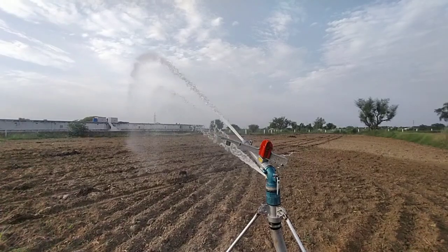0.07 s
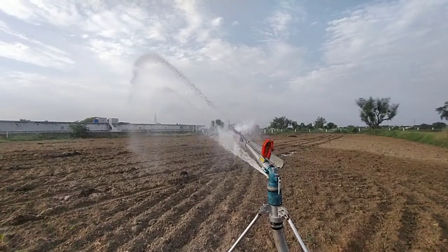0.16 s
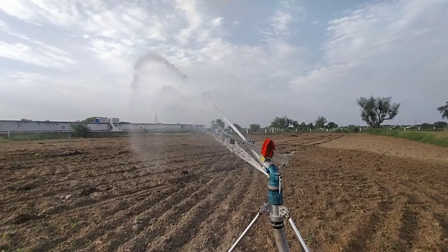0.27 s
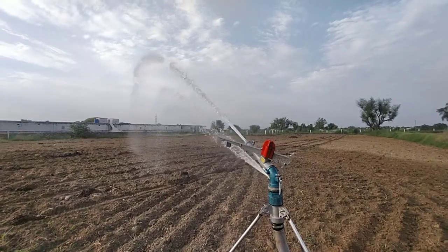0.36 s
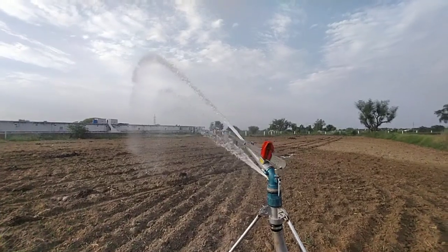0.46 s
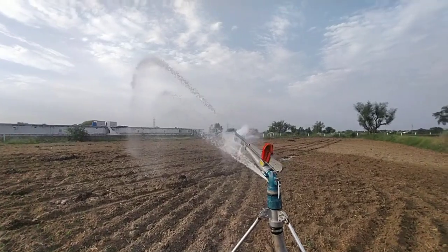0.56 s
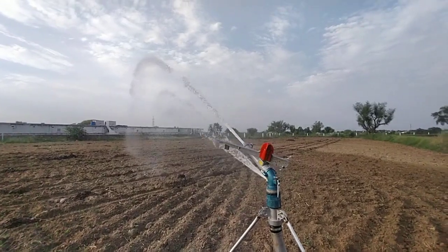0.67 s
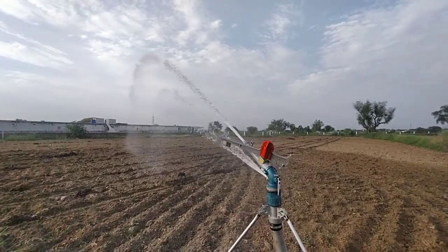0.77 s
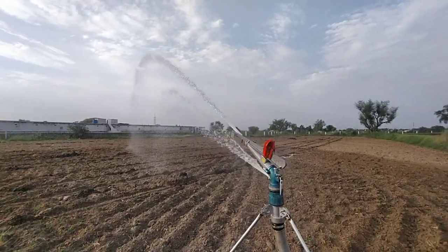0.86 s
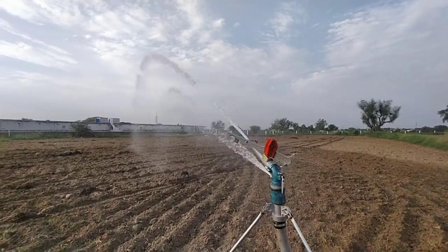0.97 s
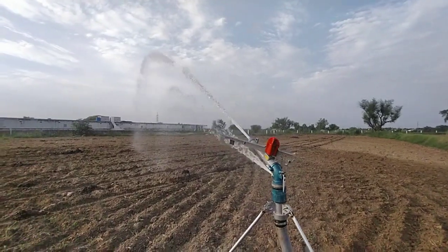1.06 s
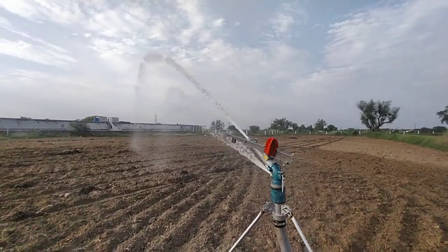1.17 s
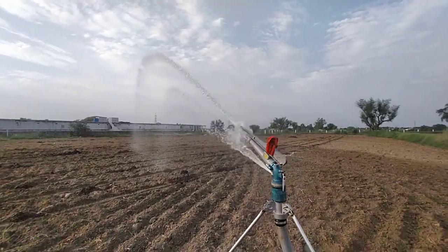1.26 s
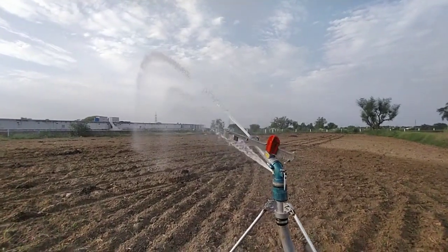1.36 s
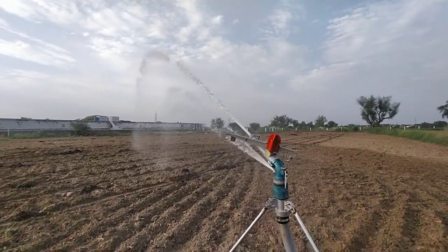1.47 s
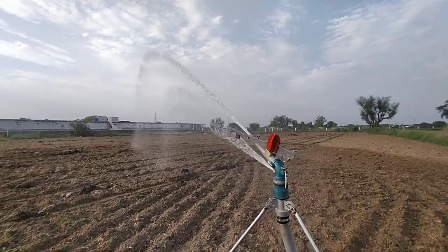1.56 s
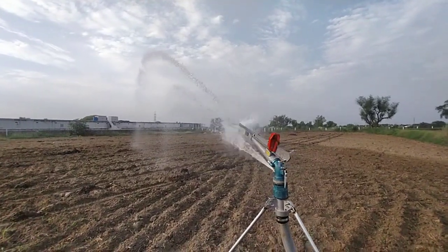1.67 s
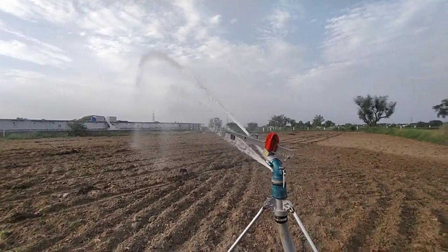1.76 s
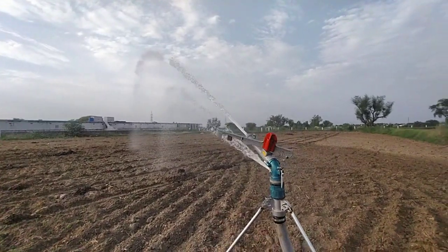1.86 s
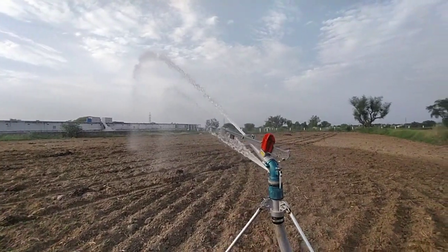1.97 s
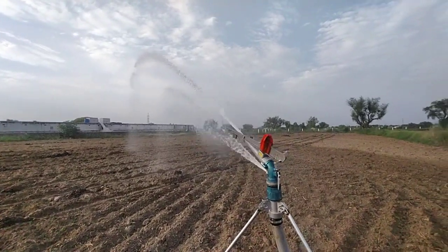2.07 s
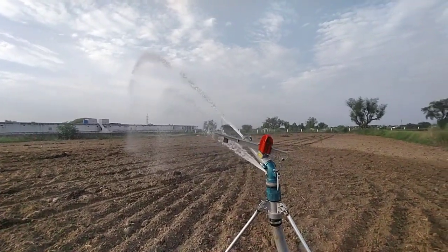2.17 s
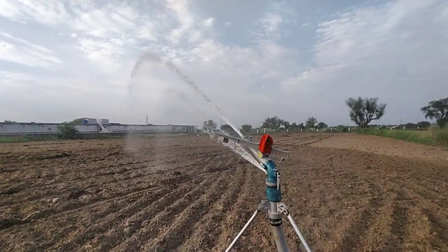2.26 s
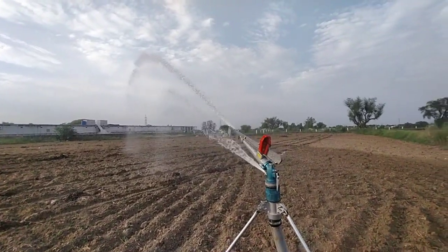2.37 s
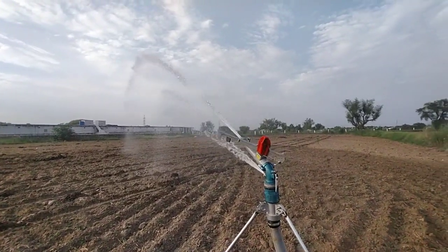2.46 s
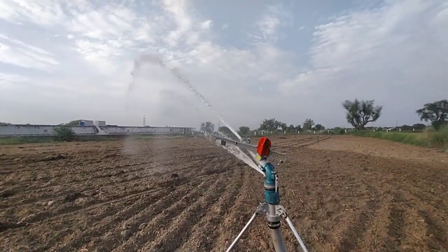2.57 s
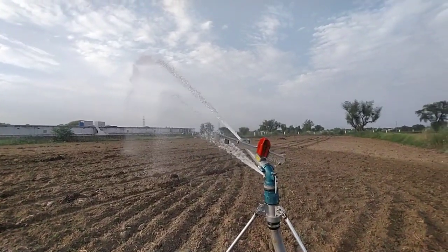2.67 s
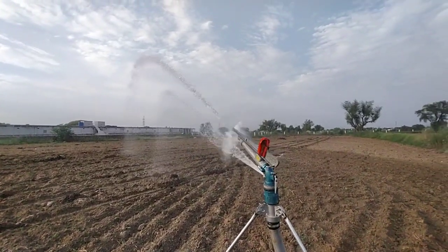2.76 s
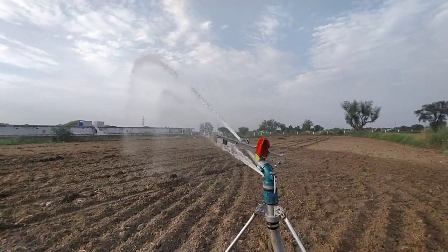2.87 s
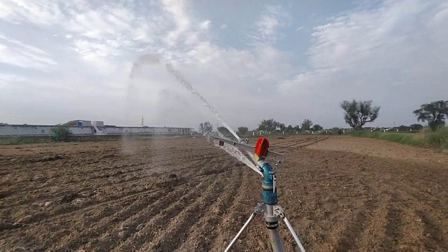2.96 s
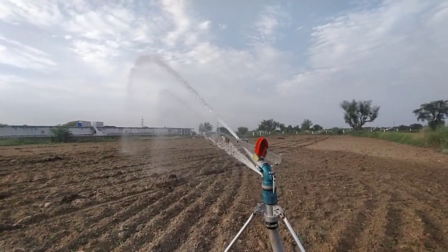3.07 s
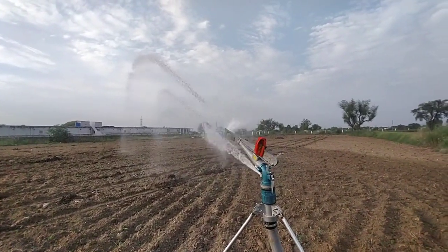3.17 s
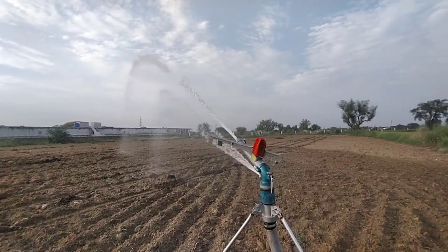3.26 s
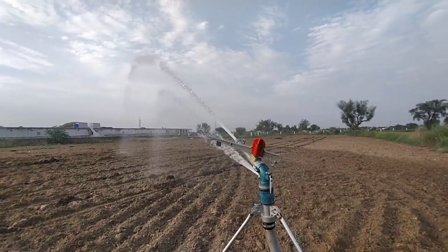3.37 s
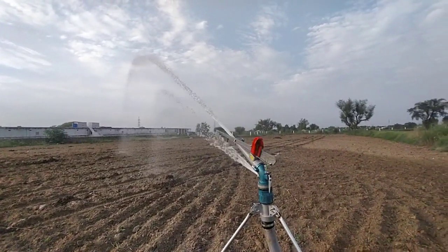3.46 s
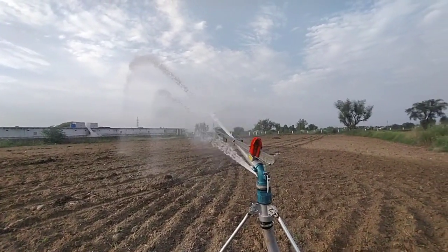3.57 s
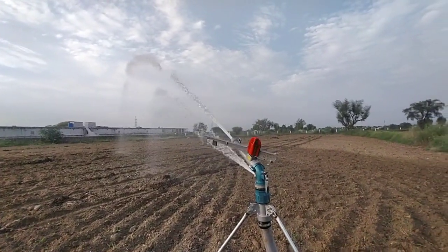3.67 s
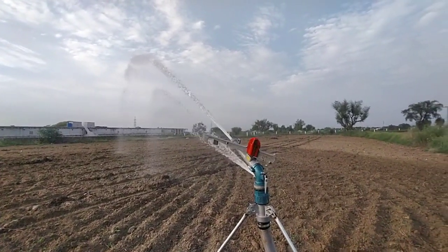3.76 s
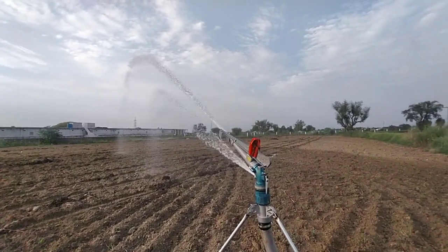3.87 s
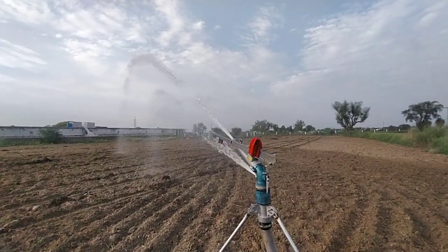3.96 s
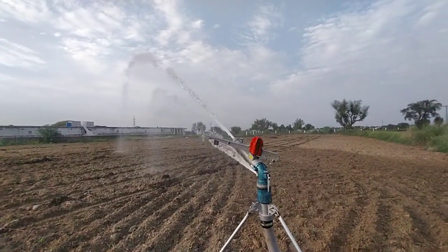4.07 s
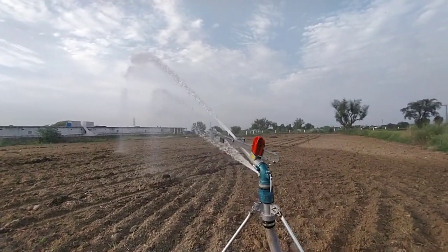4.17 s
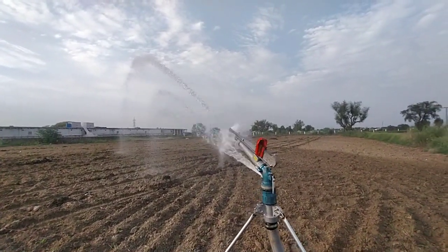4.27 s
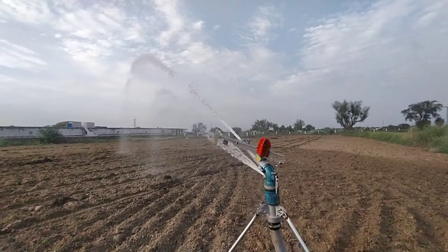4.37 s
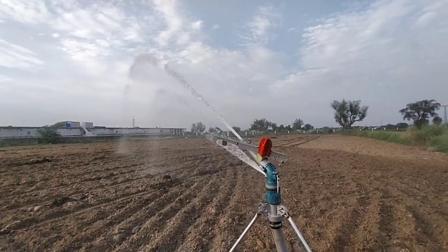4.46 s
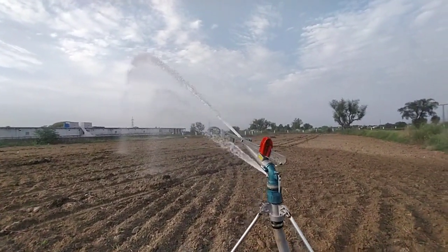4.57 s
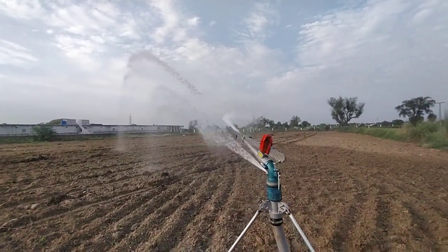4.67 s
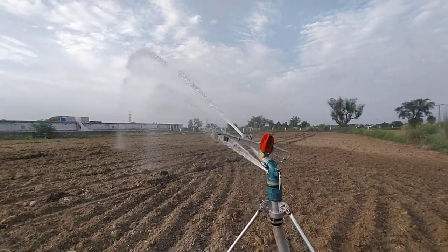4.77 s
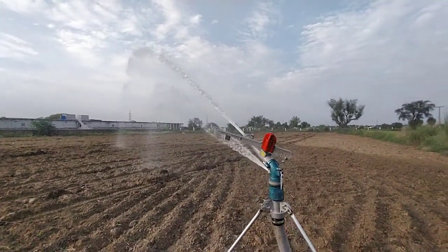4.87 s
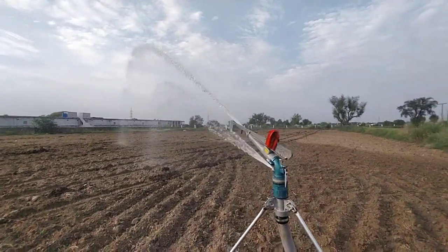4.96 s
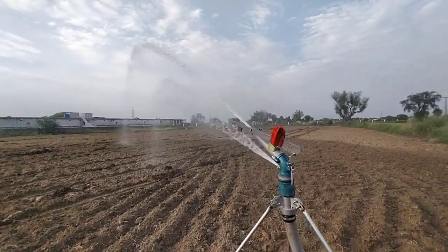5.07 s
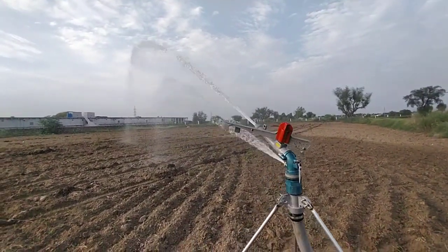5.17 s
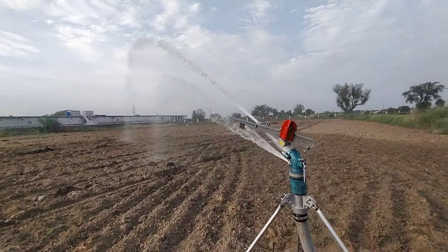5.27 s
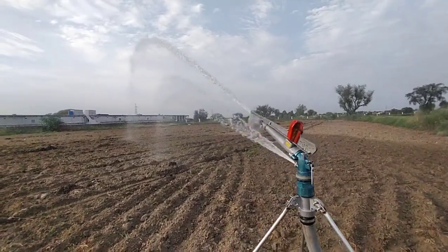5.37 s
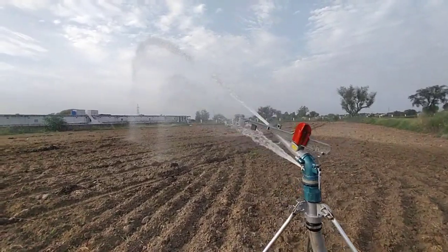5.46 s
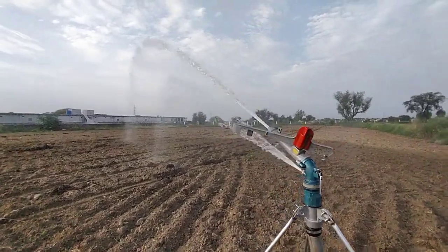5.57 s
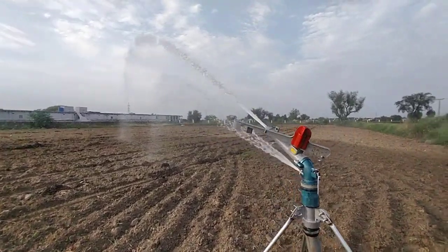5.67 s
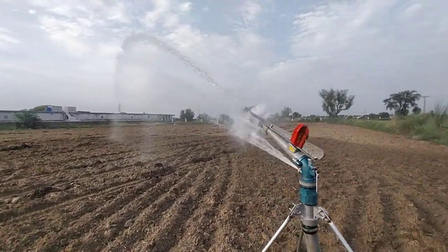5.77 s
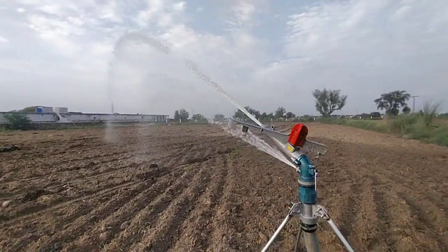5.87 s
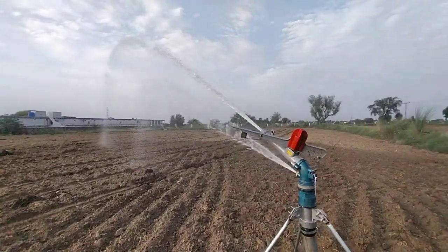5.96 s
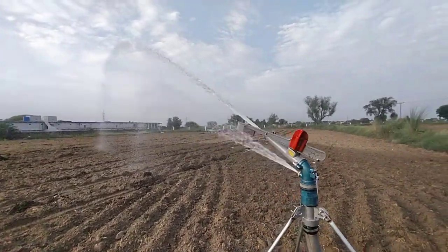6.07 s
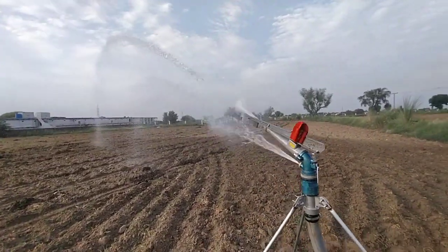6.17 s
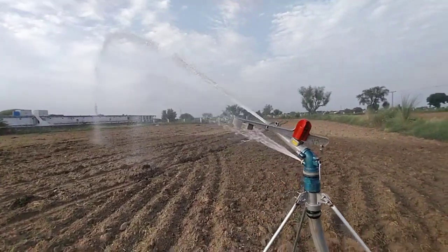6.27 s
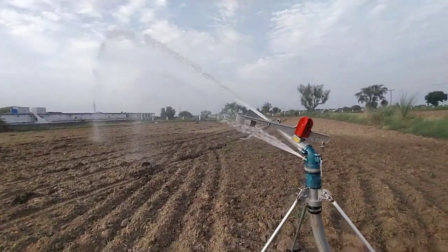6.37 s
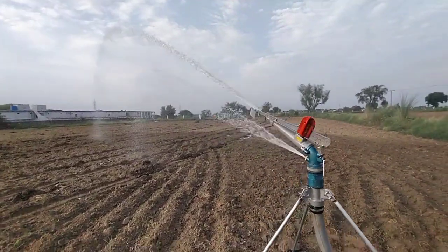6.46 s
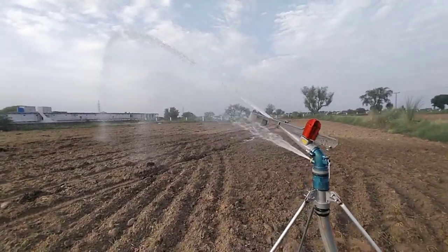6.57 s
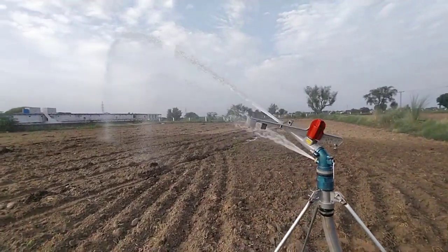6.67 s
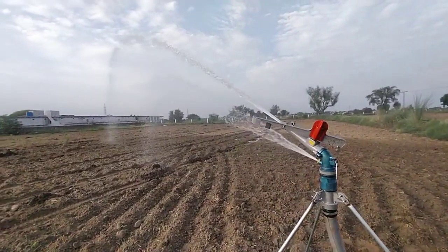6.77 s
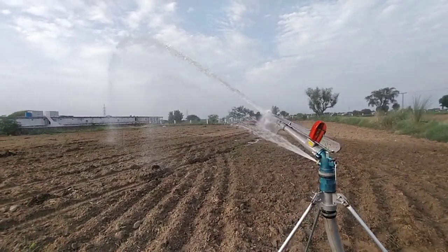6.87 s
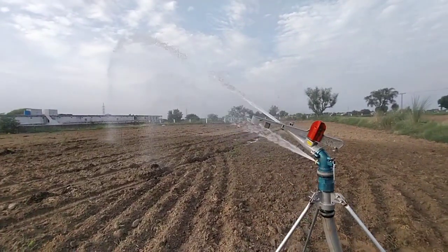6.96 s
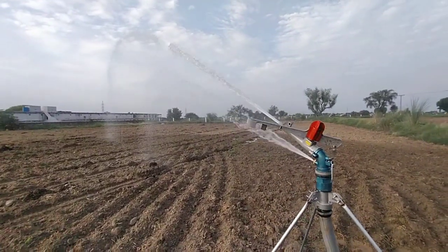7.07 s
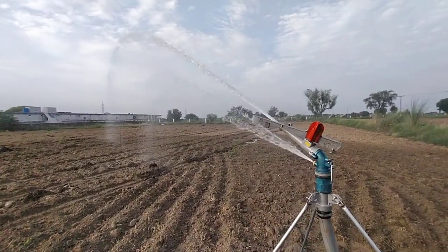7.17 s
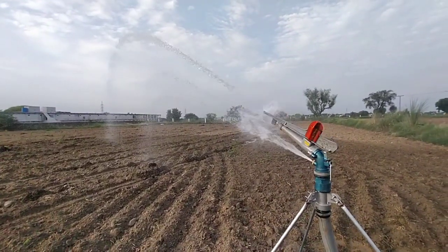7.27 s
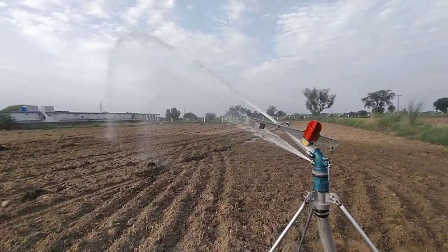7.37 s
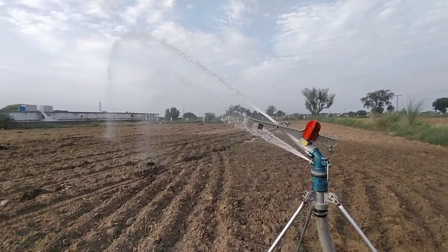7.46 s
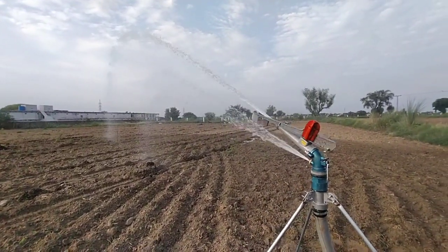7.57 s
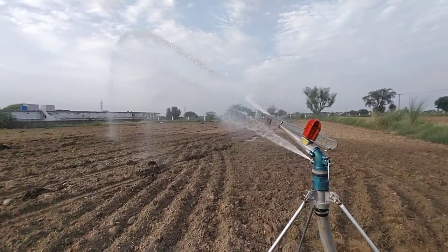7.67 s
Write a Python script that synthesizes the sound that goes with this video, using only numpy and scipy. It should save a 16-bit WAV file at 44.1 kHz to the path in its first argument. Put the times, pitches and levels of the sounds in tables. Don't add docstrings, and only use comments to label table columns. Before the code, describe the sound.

Open field, dry and without echo, with an impact sprinkler close by. Following half a second of silence, regular strokes arrive nearly three per second: splashy tss, woody-metallic clack, then loose high clinks as the arm rebounds. Between them the water jet flutters, fizzes and spits. The hiss swells and brightens towards the end as the nozzle turns. Wind rumbles irregularly on the handheld microphone, over a barely audible low pump tone.

```python
import sys
import numpy as np
from scipy import signal
from scipy.io import wavfile
from scipy.ndimage import uniform_filter1d

SR = 44100
rng = np.random.default_rng(int(sys.argv[2]) if len(sys.argv) > 2 else 0)


def how_loud(loudness_db):
    steps = np.asarray(loudness_db, float) / 20
    return 10 ** steps


def master(y):
    cut = np.clip(np.atleast_2d(y).T, -1, 1)
    pcm = np.round(cut * 32767)
    wavfile.write(sys.argv[1], SR, pcm.astype(np.int16))


N = 340893
TIME = np.arange(N) / SR
RING_HZ = 4394

# (frequency [Hz], level per Hz [dB])
SPRAY = [(240, -64), (400, 0.5), (496, -10), (814, -1.5), (1110, -16), (1350, -3), (2120, -10), (2360, -4),
         (3020, -21), (4380, 9), (5270, 2), (8900, -16), (10500, -14.5), (14600, -33.5), (16000, -15)]
# (time [s], treble gain [dB])
TURN = [(.5, -7), (3.0, -6), (5.5, -1), (7.73, 4)]


def evened(x):
    return x / np.sqrt(np.mean(x ** 2) + 1e-20)


def add(mix, s, sound):
    part = mix[round(s * SR):][:len(sound)]
    part += sound[:len(part)]


def curve(table, s):
    return np.interp(s, *np.transpose(table))


def colour(x, points):
    f, db = np.transpose(points)
    hz = np.minimum(abs(np.fft.fftfreq(2 ** 13, 1 / SR)), 14800)
    wanted_db = np.interp(np.log(hz + 1), np.log(f), db)
    log_gain = np.log(how_loud(np.maximum(wanted_db, -100)))
    phase = -signal.hilbert(log_gain).imag
    taps = np.fft.ifft(np.exp(log_gain + 1j * phase)).real[:2 ** 12]
    return signal.oaconvolve(x, taps / np.linalg.norm(taps))[:len(x)]


def split(x, hz):
    low = signal.sosfiltfilt(signal.butter(2, hz, fs=SR, output="sos"), x)
    return low, x - low


def turned(x, bright_db, hz):
    low, high = split(x, hz)
    return low * how_loud(-0.3 * bright_db) + high * how_loud(bright_db)


def drift(count, seconds):
    width = max(round(seconds * SR), 1)
    once = uniform_filter1d(rng.standard_normal(count), width)
    return evened(uniform_filter1d(once, width))


def drops(count, per_s, spread_db):
    hit = rng.random(count) < per_s / SR
    sign = np.sign(rng.standard_normal(count))
    size = np.minimum(rng.exponential(1, count), 4)
    return evened(hit * sign * how_loud(spread_db * size))


def grains(count, per_s, low_hz, high_hz, cycles, spread_db):
    clicks, pick = drops(count, per_s, spread_db), rng.integers(0, 8, count)
    out = np.zeros(count)
    for k, hz in enumerate(np.geomspace(low_hz, high_hz, 8)):
        turns = np.arange(2 ** 9) * hz / SR
        burst = np.sin(2 * np.pi * turns) * turns * np.exp(-3 * turns / cycles) / cycles
        out += signal.oaconvolve(clicks * (pick == k), burst)[:count]
    return evened(out)


def ring(force, hz, t60):
    r, w = np.exp(-np.log(1000) / (t60 * SR)), 2 * np.pi * hz / SR
    return signal.lfilter([0, np.sin(w)], [1, -2 * r * np.cos(w), r * r], force)


def hum():
    wander_hz, wander_db = 0.9 * drift(N, 0.15), 0.8 * drift(N, 0.08)
    turns = np.cumsum(127.5 + wander_hz) / SR
    return np.sqrt(2) * how_loud(-55.5 + wander_db) * np.sin(2 * np.pi * turns)


def wind():
    # (frequency [Hz], level per Hz [dB])
    rumble = [(8, -6), (20, 6.5), (40, 6.5), (80, -3), (160, -8), (300, -23), (600, -48)]
    # (time [s], level [dB])
    gusts = [(0.7, -54.5), (1.01, -53), (1.04, -41.5), (1.13, -53.5), (1.4, -50.5), (2.32, -51.5),
             (3.75, -47.5), (4.01, -54.5), (4.13, -45), (5.04, -51), (5.25, -44), (5.64, -48.5),
             (5.72, -43.5), (5.85, -50.5), (6.14, -42.5), (6.42, -48.5), (7.43, -51), (7.73, -54)]
    # (time [s], peak pressure [full scale], width [ms])
    puffs = [(0.5603, 0.096, 0.17), (0.6346, 0.032, 0.14), (1.04, 0.041, 0.3), (4.1242, -0.056, 2.2),
             (4.298, -0.01, 0.25), (5.249, 0.036, 0.17), (5.373, 0.018, 0.66), (5.719, -0.03, 4),
             (6.107, -0.044, 4.5), (6.15, 0.11, 4.4), (6.216, -0.029, 3.3)]
    lumps_db = 3 * drift(N, 0.051) + 1.7 * drift(N, 0.0098)
    out = colour(rng.standard_normal(N), rumble) * how_loud(curve(gusts, TIME) + 1.5 + lumps_db)
    t = np.arange(-400, 2000) / SR
    after = np.maximum(t, 0)
    for s, peak, ms in puffs:
        push = 1 / (1 + (t / (ms / 1000)) ** 2)
        swing = 0.5 * np.sqrt(ms) * np.sin(2 * np.pi * 24 * after) * np.exp(-after / 0.013)
        add(out, s + t[0], peak * (push - swing))
    return out


def jet():
    # (frequency [Hz], level per Hz [dB])
    hiss_colour = [(150, -48), (250, -5), (319, -7.5), (519, -12), (586, -8), (860, -4.5), (955, -5),
                   (1670, -3.5), (1980, -4.5), (3650, -4.5), (4990, 0.5), (8400, -15), (10200, -19.5),
                   (14900, -24.5), (16000, -1)]
    # (frequency [Hz], level [dB], time to fall 60 dB [s])
    pipe = [(890, -41, 0.14), (1714, -38, 0.045), (2310, -52.5, 0.15)]
    # (time [s], hiss level [dB])
    nearness = [(.55, -56), (.9, -52.5), (2.0, -49.5), (3.14, -47.5), (3.7, -49), (4.3, -47.5), (5.75, -45),
                (6.5, -45.5), (7.6, -45.5)]
    # (frequency [Hz], level per Hz [dB])
    mist_colour = [(6000, -18), (8700, -17), (9700, -3.5), (10500, -1.5), (11600, -16), (13500, -11.5),
                   (16000, -17)]
    flutter_db = 2.45 * drift(N, 0.00094) + 0.57 * drift(N, 0.043)
    flow = rng.standard_normal(N) * how_loud(flutter_db)
    water = colour(flow, hiss_colour)
    for hz, db, t60 in pipe:
        water += how_loud(db) * ring(flow, hz, t60)
    water += grains(N, 1300, 3500, 6000, 4.5, 3.8) * how_loud(-5 + 2.5 * drift(N, 0.012))
    water += grains(N, 220, 3000, 8000, 1.6, 3.2) * how_loud(-13 + 3 * drift(N, 0.05))
    near_db = curve(nearness, TIME)
    near = turned(water, curve(TURN, TIME), 5550) * how_loud(near_db + 1.0)
    mist = colour(rng.standard_normal(N), mist_colour)
    return near + how_loud(-67.5 + 1.13 * (near_db + 53.5)) * mist


def rattle(s, ring_db, knock_db):
    # (frequency [Hz], level [dB], time to fall 60 dB [s])
    knock = [(1430, -17, 0.055), (1800, 1.5, 0.02), (2030, -3.5, 0.01), (2405, -1.5, 0.016),
             (3230, -4, 0.008)]
    t = np.arange(5000) / SR
    turn_db = curve(TURN, s)
    twin = np.sin(2 * np.pi * ((RING_HZ - 35) * t + rng.random()))
    pair = np.sin(2 * np.pi * RING_HZ * t) + 0.1 * twin
    ring_s = 0.064 * (1 + 0.035 * turn_db)
    bright = pair * how_loud(-60 * (t / ring_s) ** 1.17) * (1 - np.exp(-t / 0.0013))

    touch = np.exp(-t / 0.0062) * rng.standard_normal((len(knock) + 1, len(t)))
    pitch = 0.89 + 0.012 * turn_db
    dull = sum(how_loud(db) * ring(force, hz * pitch, t60) for force, (hz, db, t60) in zip(touch, knock))
    dull = dull / abs(dull).max() + 0.16 * colour(touch[-1], SPRAY)
    return s - 0.001, how_loud(ring_db + 5.5) * bright + how_loud(knock_db + 0.5) * dull


def chatter(s, spray_db):
    # (time after the stroke [s], ring against the spray [dB], dull knock against the spray [dB])
    bounces = [
        (.043, -35, -22.5),
        (.07, -36, -28.5),
        (.097, -36.5, -29.5),
        (.122, -49, -26.5),
        (.146, -46, -34),
    ]
    chance = rng.standard_normal((len(bounces), 3)) * [0.0043, 3.5, 3.5]
    return np.array(bounces) + chance + [s, spray_db, spray_db]


def torn_spray(t, turn_db):
    # (frequency [Hz], level [dB], time to fall 60 dB [s])
    spoon = [(3380, -4, 0.02), (3680, 5, 0.021), (3896, 14, 0.014), (4221, -28, 0.01), (5240, -17, .02),
             (5500, -6, 0.06)]
    stay_s = 0.038
    rise = np.clip((t - 0.004) / 0.0081, 0, 1) ** 0.66
    leaving = 1 + np.exp(np.minimum((t - 0.008 - stay_s) / 0.004, 50))
    crossing = how_loud(-220 * t) / leaving
    fallout = how_loud(-20.5 - 76.0 * t)
    raw = 0.39 * rng.standard_normal(len(t)) + 0.14 * drops(len(t), 3000, 6.0)
    flutter_db = 2.2 * drift(len(t), 0.00029) + 1.16 * drift(len(t), 0.0021)
    force = raw * rise * (crossing + fallout) * how_loud(flutter_db)
    splash = colour(force, SPRAY)
    for hz, db, t60 in spoon:
        splash += how_loud(db - 33 - 0.24 * turn_db) * ring(force, hz * rng.normal(1, 0.016), t60)
    low, high = split(splash, 1800)
    low *= np.clip((t - 0.006) / 0.0036, 0, 1)
    spray = how_loud(-1.5) * turned(low + high, 0.61 * turn_db, 3900)
    slap = how_loud(-9) * np.diff(rng.standard_normal(len(t) + 1)) * (t > 0.0075) * np.exp(-t / 0.0028)
    mist = how_loud(-11.5) * split(colour(raw, SPRAY), 8700)[1] * rise / leaving
    return spray + slap + mist


def body_knock(u, far_db):
    # (frequency [Hz], level [dB], time to fall 60 dB [s], share of the turn [dB per dB])
    body_notes = [(853, -13, 0.031, -0.11), (940, -6.5, 0.023, -0.016), (1422, -0.5, 0.042, -0.69),
                  (1600, -6, 0.038, -1.4), (1812, 0, 0.012, 0.98), (2264, -8.5, 0.025, 0.05),
                  (2550, -15, 0.014, 1)]
    blow = (1 - np.exp(-u / 0.00051)) * np.exp(-u / 0.0064)
    body = np.zeros(len(u))
    for hz, db, t60, share in body_notes:
        force = blow * drops(len(u), 6000, 3.1)
        body += how_loud(db + share * far_db) * ring(force, hz * rng.normal(1, 0.018), t60)
    return body / np.sqrt(np.max(uniform_filter1d(body ** 2, size=300)))


def stroke(s, spray_db, knock_db, far_db):
    t = np.arange(8000) / SR
    u = np.maximum(t - 0.012, 0)
    spray = how_loud(spray_db) * torn_spray(t, curve(TURN, s))
    body = body_knock(u, far_db)
    tail = (1 - np.exp(-u / 0.0076)) * np.exp(-u / 0.071) * signal.windows.tukey(len(t), 0.3)
    dribble = how_loud(-19) * tail * grains(len(t), 1200, 1424, 2790, 9.8, 2.3)
    wet = split(spray + how_loud(knock_db - 5.5) * (body + dribble), 516)[1]
    jingle = how_loud(spray_db - 37) * evened(ring(drops(len(t), 400, 3.0), RING_HZ, 0.04)) * tail
    thud = how_loud(-35.5) * np.sin(2 * np.pi * 210 * u) * np.exp(-u / 0.0077)
    return s - 0.008, wet + jingle + thud


def scene():
    # (time [s], spray [dB], body knock [dB], turn of the body's far side [dB])
    strokes = [(0.6638, -18, -22, -0.5), (1.037, -14.5, -20.5, 1.5), (1.4133, -13.5, -21, -4),
               (1.7868, -12, -20, 0.5), (2.1582, -12, -19.5, -2), (2.5284, -12, -22, -2),
               (2.9009, -11, -18, -3), (3.2775, -10, -17, -2), (3.654, -10.5, -18.5, 4),
               (4.026, -11, -18, -6), (4.3962, -9.5, -23.5, -2.5), (4.7649, -8.5, -24.5, -8),
               (5.1393, -9.5, -18.5, -2), (5.5134, -10, -19, 2.5), (5.8861, -7.5, -17.5, 1.5),
               (6.2595, -9, -19, -4), (6.6342, -8.5, -15, 4.5), (7.0073, -9, -16.5, 19),
               (7.379, -7.5, -14, 9)]
    # (time [s], ring [dB], dull knock [dB])
    rattles = [(0.761, -42, -37), (1.1332, -44, -36), (1.4724, -40, -31.5), (1.538, -34, -34.5),
               (1.836, -46, -27), (1.8822, -39, -36), (1.9103, -35, -35.5), (2.272, -34.5, -34),
               (2.3255, -39.5, -58), (2.5771, -49, -30), (2.599, -39, -33), (2.6514, -32.5, -31.5),
               (3.367, -36.5, -45), (3.3978, -28, -29.5), (4.0677, -50, -30), (4.125, -36, -34.5),
               (4.151, -25, -28), (4.4927, -37, -37), (4.8653, -30.5, -40), (4.889, -29.5, -35),
               (5.2266, -32.5, -44), (5.257, -31, -31), (5.595, -35.5, -45), (5.949, -33.5, -41),
               (6.328, -38, -32.5), (6.6736, -24.5, -44), (6.7537, -44, -32), (7.043, -33, -38),
               (7.1532, -44, -32.5), (7.4782, -38.5, -30)]
    arm = np.zeros(N)
    for s, spray_db, knock_db, far_db in strokes:
        add(arm, *stroke(s, spray_db, knock_db, far_db))
        for tap in chatter(s, spray_db):
            add(arm, *rattle(*tap))
    for tap in rattles:
        add(arm, *rattle(*tap))
    return (arm + jet() + wind() + hum())[None]


def band_limit(x):
    return signal.sosfilt(signal.butter(12, 16480, fs=SR, output="sos"), x)


def record(dry):
    t = TIME - 22336 / SR
    offset = -0.045 * np.exp(-t / 0.62) + 0.028 * np.exp(-t / 0.22)
    opened = (0.7 * np.tanh(dry / 0.7) + offset) * (t >= 0)
    low_pass = signal.firwin(511, 15500, fs=SR)
    return band_limit(signal.oaconvolve(opened, low_pass[None], "same"))


dry = scene()
out = record(dry)
master(out)
```